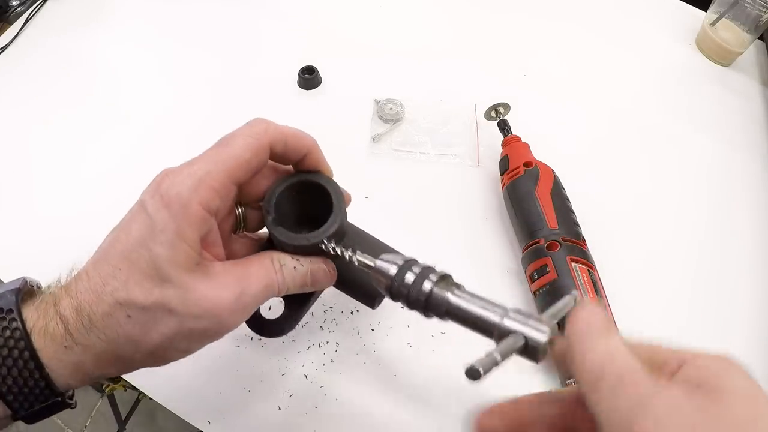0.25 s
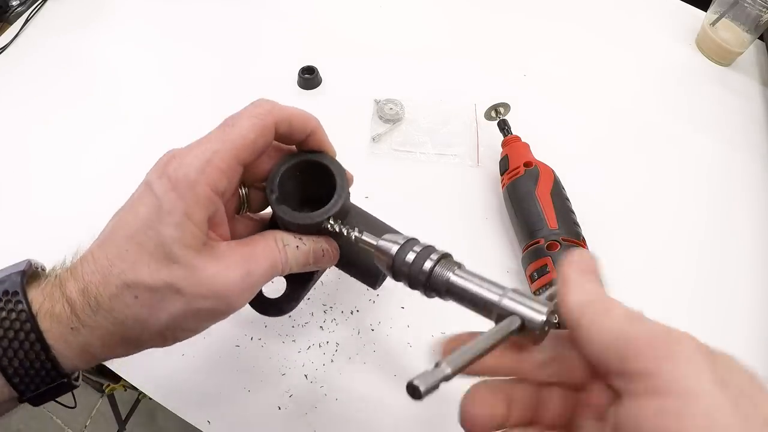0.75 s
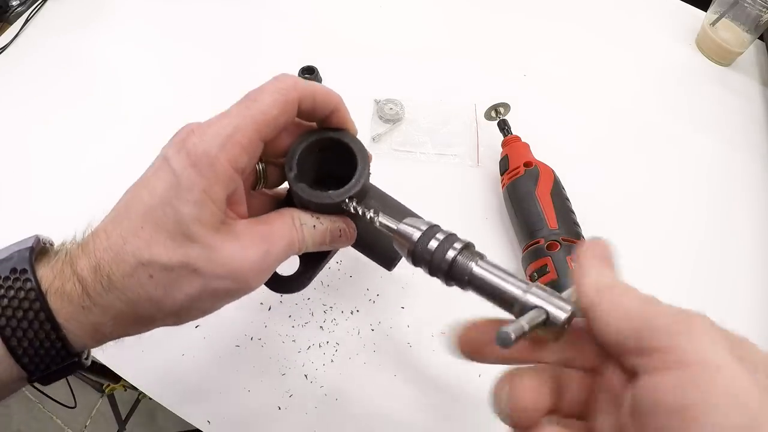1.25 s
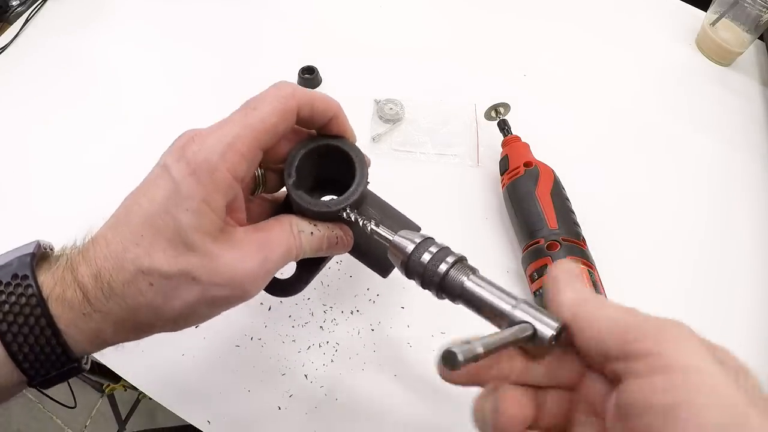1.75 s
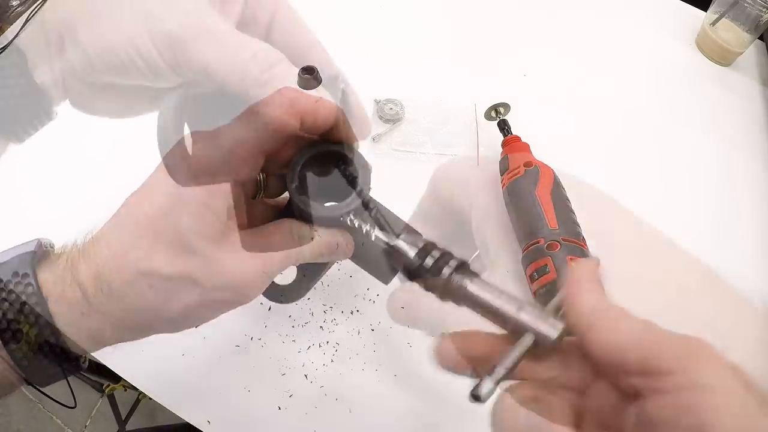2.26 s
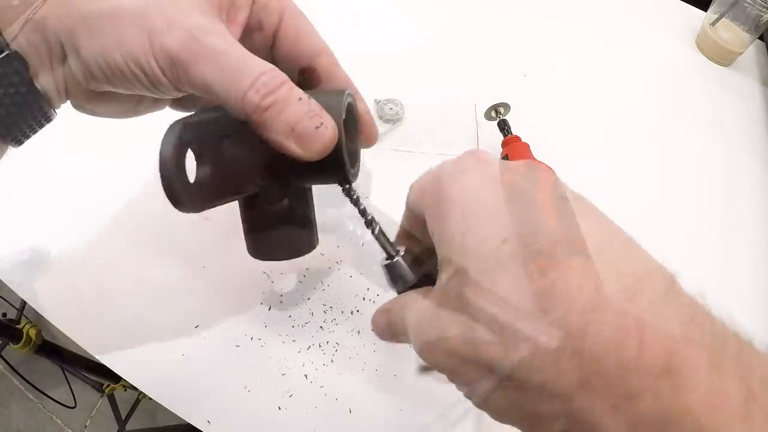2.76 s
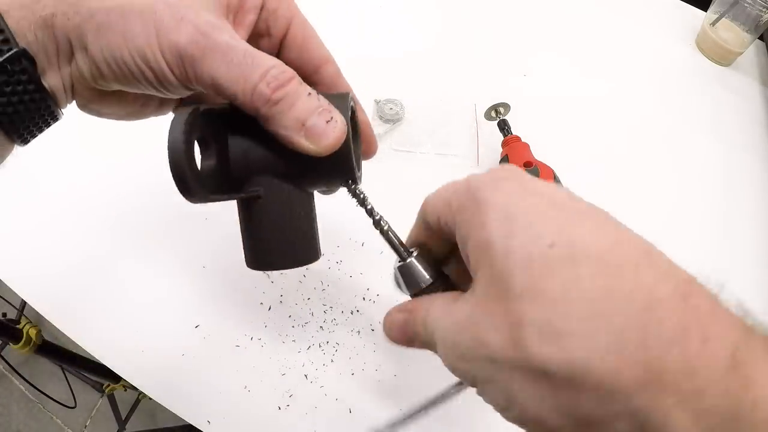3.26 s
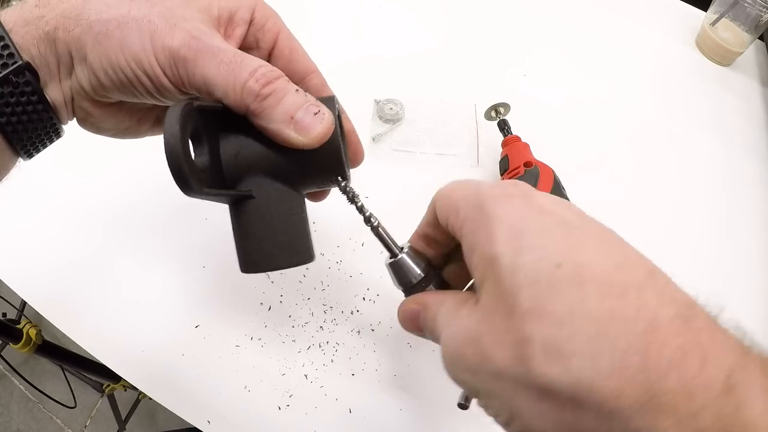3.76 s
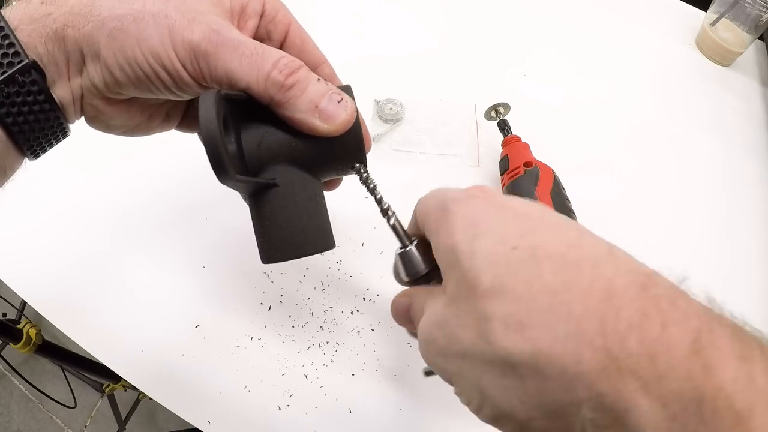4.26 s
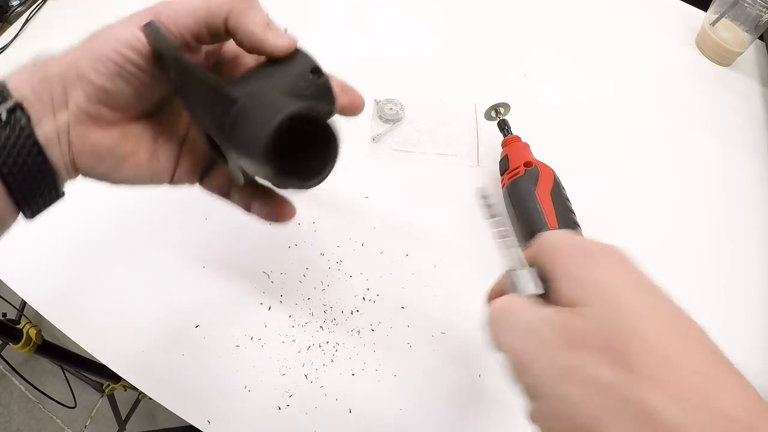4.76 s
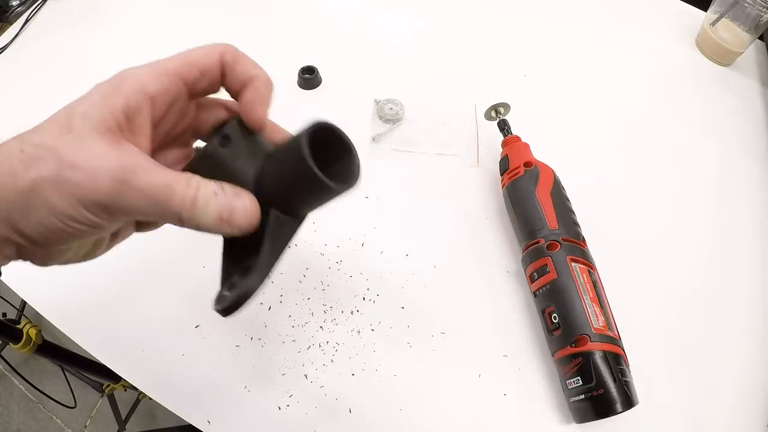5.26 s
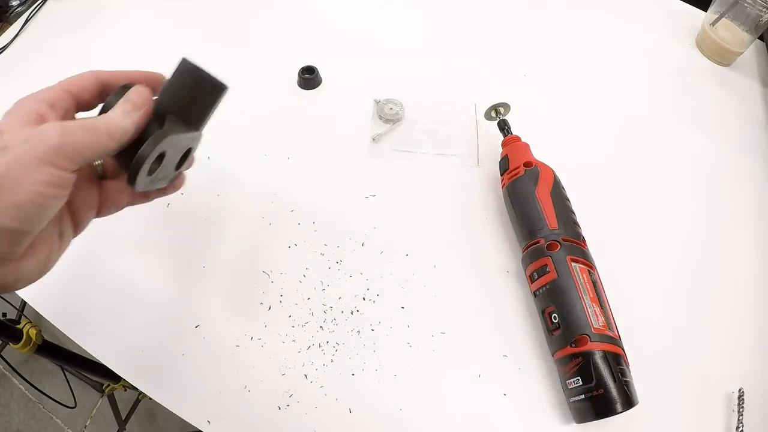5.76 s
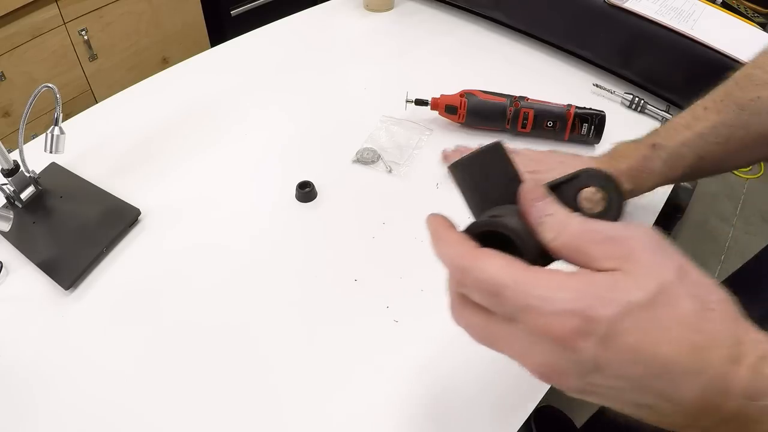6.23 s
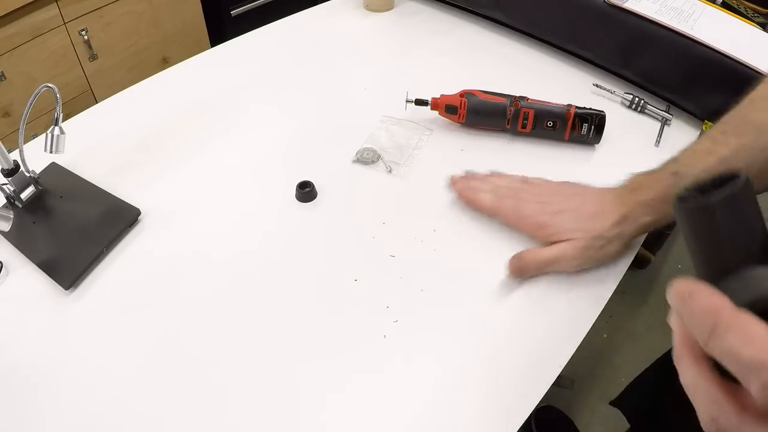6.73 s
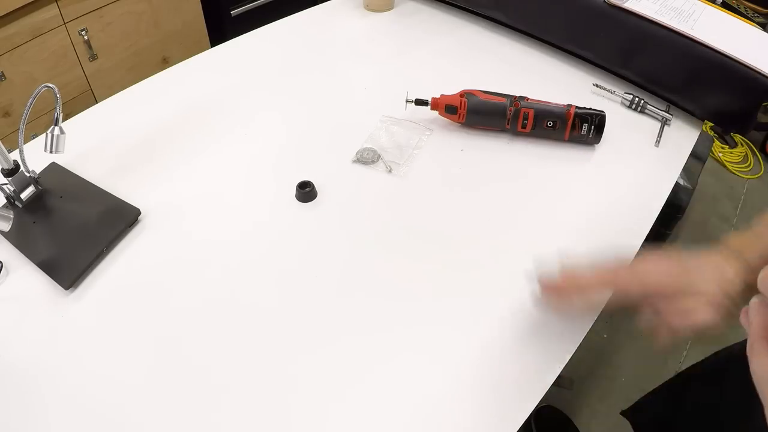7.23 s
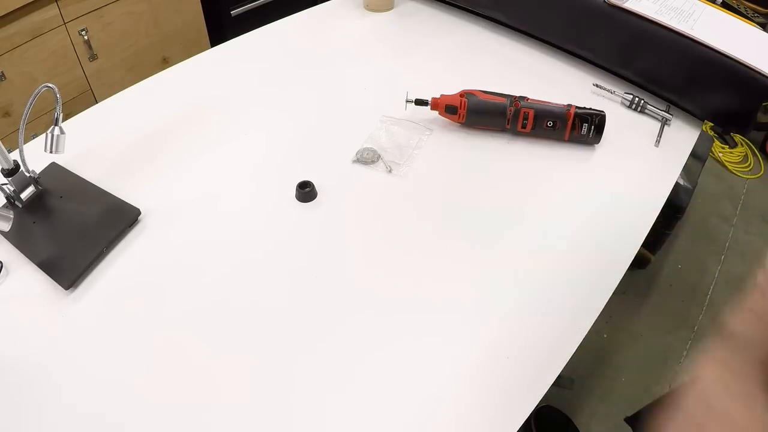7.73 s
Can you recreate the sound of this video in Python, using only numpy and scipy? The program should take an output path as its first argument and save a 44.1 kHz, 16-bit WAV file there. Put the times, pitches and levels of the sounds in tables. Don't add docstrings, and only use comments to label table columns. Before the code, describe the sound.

Metallic clanks, small hollow ticks and faint skin hiss, then a heavy metal-on-table crash, followed by brushing palm strokes in a quiet humming workshop.

```python
import sys
import numpy as np
from scipy import signal
from scipy.fft import rfft, irfft, next_fast_len
from scipy.io import wavfile
from scipy.ndimage import uniform_filter1d, map_coordinates

SR = 44100
rng = np.random.default_rng(int(sys.argv[2]) if len(sys.argv) > 2 else 0)


def volts(x):
    e = np.asarray(x, float) / 20
    return 10 ** e


def transcribe(u):
    v = np.clip(np.atleast_2d(u).T, -1, 1)
    q = np.round(v * 32767).astype(np.int16)
    wavfile.write(sys.argv[1], SR, q)


N = 352337


def unit(x):
    return x / np.sqrt(np.mean(x ** 2) + 1e-20)


def along(points, hz):
    f, v = np.transpose(points)
    return np.interp(np.log(hz + 1), np.log(f + 1), v)


def wobble(rate_hz):
    knots = rng.standard_normal(int(N * rate_hz / SR) + 4)
    return map_coordinates(knots, [np.arange(N) * rate_hz / SR])


def filtered(x, response):
    m = next_fast_len(len(x) + 8192)
    return irfft(rfft(x, m) * response(np.fft.rfftfreq(m, 1 / SR)), m)[:len(x)]


def peak(f, hz, width_hz):
    return 1j * f * width_hz / (hz * hz - f * f + 1j * f * width_hz + 1e-9)


def body(modes):
    return lambda f: sum((-1) ** k * volts(db) * peak(f, hz, w) for k, (hz, w, db) in enumerate(modes))


def coloured(x, spectrum):
    return unit(filtered(x, lambda f: volts(along(spectrum, f))))


def grit(spread_db):
    slip = np.minimum(rng.exponential(size=N // 40 + 1), 4).repeat(40)[:N]
    return rng.standard_normal(N) * volts(spread_db * slip)


def patchy(x, depth_db):
    z = signal.stft(x, nperseg=256)[2]
    field = uniform_filter1d(rng.standard_normal(z.shape), size=5, axis=0)
    field = uniform_filter1d(field, size=12, axis=1)
    return unit(signal.istft(z * volts(depth_db * unit(field)), nperseg=256)[1][:N])


def ring(modes, t, scatter_db):
    return sum(volts(db + rng.normal(0, scatter_db) - 60 * t / t60_s) * np.sin(2 * np.pi * hz * t)
               for hz, db, t60_s in modes)


def build_up(t, seconds=0.00038):
    return 1 - np.exp(-t / seconds)


def snap(t, hz, share, t60_s):
    burst = (3.6 + rng.standard_normal(len(t))) * volts(-60 * t / t60_s)
    crack = filtered(burst, lambda f: peak(f, hz, share * hz) * peak(f, hz, (share + .6) * hz))
    return crack / np.abs(crack).max()


def swells(starts_s, holds_s, rise_db_s, fall_db_s):
    late_s = np.arange(0, N, 32) / SR - np.array(starts_s)[:, None]
    rise_db = rise_db_s * late_s
    fall_db = fall_db_s * (np.array(holds_s)[:, None] - late_s)
    return volts(np.minimum(0, np.minimum(rise_db, fall_db)))


def total(levels_db, shapes):
    return np.sqrt(volts(2 * np.array(levels_db)) @ shapes ** 2).repeat(32)[:N]


def add(track, s, sound):
    start = round(s * SR)
    track[start:start + len(sound)] += sound[:len(track) - start]


def clanks():
    # start_s, peak_db, low_modes_db, rattle_db, free_ring_db
    clank_rows = [
        (.467, -26, -0.5, -13, -24),
        (1.513, -19, -7, -17, -22),
        (2.025, -22, -5, -12, -22),
        (2.509, -24.5, -3, -16, -33),
        (3.998, -38, -1.5, -9, -24),
        (4.351, -47, -13, -12, -12),
        (5.7654, -21, -23, -12, 4),
    ]
    # first_hz, second_hz, second_db, sheen_db
    shank_rows = [(9570, 12200, 5, -3), (12100, 15100, -11, -10.5), (12500, 10900, 2, -6),
                  (13300, 10000, 1, -8), (12200, 9000, 0, -7), (12300, 8000, -6, -8), (12000, 8200, 0, -6)]
    # hz, width_hz, level_db
    steel_modes = [(1700, 110, 7), (2180, 140, 5), (2600, 500, -8), (3590, 120, 4), (4700, 900, -14),
                   (5820, 500, -2), (9300, 630, -30)]
    # hz, width_hz, level_db
    bar_rough = [(12170, 280, 0), (6510, 300, -20), (13250, 300, -18)]
    # hz, level_db, t60_s
    bar_clear = [(11990, -3, .06), (12155, 8, .04), (12305, 0, .045), (6610, -34, .2)]
    # delay_s, level_db
    wall_rows = [(.0075, -10), (.017, -19), (.026, -21)]
    seat_s, wall_low_db = 0.001, -5
    out, t = np.zeros(N), np.arange(SR // 3) / SR
    push = 5 * volts(-60 * t / .0004)
    for clank, shank in zip(clank_rows, shank_rows):
        s, db, low_db, rattle_db, free_db = clank
        first_hz, second_hz, second_db, sheen_db = shank
        force = t / seat_s * np.exp(1 - t / seat_s) + volts(rattle_db - 60 * t / .06)
        hit = rng.standard_normal(len(t)) * force
        high = filtered(hit, lambda f: peak(f, first_hz, 1260) ** 2
                        - volts(second_db) * peak(f, second_hz, 1200) ** 2
                        + volts(sheen_db) * peak(f, 11400, 9700))
        low = filtered(hit + push, lambda f: body(steel_modes)(f) + 0.28 * peak(f, 2600, 7000))
        linger = unit(filtered(rng.standard_normal(len(t)), body(bar_rough))) * volts(-16 - 60 * t / 0.16)
        free = (ring(bar_clear, t, 1) + linger) * build_up(t)
        bright = high / np.abs(high).max() + volts(free_db) * free
        dark = volts(low_db) * low / np.abs(low).max()
        add(out, s, volts(db) * (bright + dark))
        for delay_s, wall_db in wall_rows:
            add(out, s + delay_s, volts(db + wall_db) * (bright + volts(wall_low_db) * dark))
    return out


def ticks():
    # start_s, ring_peak_db, crack_db, crack_hz
    bore_rows = [(.761, -48, -58, 5700), (.9856, -34, -46, 5180), (1.251, -51, -43, 4500),
                 (1.771, -43.5, -37.5, 8700), (2.0084, -32.5, -47, 6800), (2.282, -45, -42, 9100),
                 (2.883, -41.5, -49, 3730), (3.637, -50.5, -58, 9950), (3.871, -53, -44.5, 3700),
                 (4.001, -50, -41.5, 4500), (5.143, -49, -44, 6410)]
    # start_s, ring_peak_db, crack_db, crack_hz
    sleeve_rows = [(1.02, -25.5, -36.5, 4700), (2.449, -44, -49.5, 2900), (3.944, -64, -46.5, 4740),
                   (4.14, -52, -48, 4720), (5.063, -31, -42, 3830)]
    # start_s, ring_peak_db, ring_hz,
    # crack_db, crack_hz
    flange_rows = [(0.276, -39.5, 1920, -39.5, 3580), (.295, -39, 1540, -37.5, 2880),
                   (.532, -45, 870, -57, 11900), (.997, -35, 2060, -36, 6400),
                   (1.0594, -24.5, 1326, -29, 3120), (2.0225, -37, 1650, -45, 4600),
                   (5.7583, -17, 1900, -26, 4000), (5.7605, -21, 1980, -24, 3900),
                   (2.838, -46, 1450, -52, 7660), (5.237, -30.5, 1250, -36, 3020),
                   (5.588, -29, 1360, -38, 2100), (5.7045, -21, 640, -36, 1600),
                   (6.295, -36, 1140, -38, 1800), (7.899, -36, 710, -43.5, 7200),
                   (7.928, -40, 1210, -38, 2200)]
    bore_hz, bore_t60_s = 1745, 0.023
    sleeve_hz, sleeve_t60_s = 790, 0.024
    flange_t60_s = 0.014
    contacts = [(s, db, bore_hz, bore_t60_s, *crack) for s, db, *crack in bore_rows]
    contacts += [(s, db, sleeve_hz, sleeve_t60_s, *crack) for s, db, *crack in sleeve_rows]
    contacts += [(s, db, hz, flange_t60_s, *crack) for s, db, hz, *crack in flange_rows]
    out, t = np.zeros(N), np.arange(2048) / SR
    for s, db, hz, t60_s, crack_db, crack_hz in contacts:
        crack = snap(t, crack_hz, 0.12, 0.0077) + .75 * snap(t, crack_hz, 1.8, 0.0046)
        hollow_ring = ring([(hz, db + 1.5, t60_s)], t, 0) * build_up(t)
        add(out, s, volts(crack_db) * crack - hollow_ring)
    return out


def thuds():
    # start_s, peak_db, pitch_hz
    thud_rows = [
        (0.4676, -43.5, 420),
        (1.0587, -22, 1200),
        (1.514, -40, 420),
        (2.51, -43, 560),
        (5.2369, -31, 990),
        (6.295, -42, 900),
    ]
    out, t = np.zeros(N), np.arange(2048) / SR
    for s, db, hz in thud_rows:
        u = 2 * np.pi * hz * t
        add(out, s, -volts(db + 18.5) * u * u * (1 - u / 3) * np.exp(-u))
    return out


def snaps():
    # start_s, peak_db, centre_hz, width_share
    snap_rows = [(.26, -36, 13500, 0.32), (.275, -32, 12900, .5), (.2987, -27.5, 9700, 0.8),
                 (.193, -49, 2000, .6), (.7295, -46, 14200, .3), (.98, -43, 9000, .6),
                 (.997, -38, 6700, .15), (.816, -29, 13900, 0.12), (.971, -44, 9000, 0.58),
                 (.987, -36, 15000, .2), (1.007, -42, 8330, .3), (1.0404, -27.5, 7800, 0.09),
                 (1.0403, -29, 8500, 1.2), (1.0405, -41, 3200, .15), (1.195, -48, 9500, .5),
                 (1.252, -37.5, 8950, 0.11), (1.393, -43.5, 3900, 1), (2.646, -47, 12500, .4),
                 (2.75, -48, 5500, .8), (2.776, -50, 6000, 1.2), (2.282, -45, 4000, 1.3),
                 (2.5105, -35, 1700, .05), (5.589, -40, 3900, .4), (7.9285, -43, 3500, .5),
                 (2.928, -42, 3800, .7), (2.919, -41, 6000, .9), (3.87, -43, 8400, .2),
                 (3.871, -45, 3500, 1), (4.132, -30.5, 7800, 0.17), (4.352, -42.5, 4400, 0.22),
                 (4.359, -47, 2700, .3), (4.985, -44, 5000, 1), (5.37, -52, 3200, .6),
                 (5.403, -50, 5000, 1), (5.449, -49, 5000, 1.2), (5.063, -36, 7950, 0.33),
                 (5.2115, -29.5, 8800, 0.33), (5.785, -30, 7000, 1), (5.8165, -33, 8800, .2),
                 (5.293, -45, 9500, .4), (5.704, -44, 4500, 1.2), (5.777, -20, 9300, .27),
                 (7.928, -35, 8950, 0.99)]
    # start_s, peak_db, centre_hz, width_share (of centre)
    jaw_rows = [(.9945, -35, 11000, 1.8), (2.009, -39, 5500, 0.53), (5.779, -30, 9000, 1.1)]
    snap_t60_s, jaw_t60_s = 0.0056, 0.055
    out, t = np.zeros(N), np.arange(2048) / SR
    for rows, t60_s in (snap_rows, snap_t60_s), (jaw_rows, jaw_t60_s):
        for s, db, hz, share in rows:
            add(out, s, volts(db) * snap(t, hz, share, t60_s))
    return out


def rubbing():
    # start_s, hold_s, skin_db, bite_db (edge over skin)
    slide_rows = [(0.027, 0.068, -51, -8.5), (0.153, 0.041, -61, -12), (0.29, 0.093, -57.5, -22),
                  (0.487, 0.018, -60, -7), (0.622, 0.022, -52.5, -4), (0.817, 0.035, -66.5, -5),
                  (1.127, 0.015, -50, -5), (1.27, 0.08, -69, -7), (1.63, 0.039, -55.5, -5),
                  (1.846, .015, -67, -11), (1.907, 0.013, -67.5, -4.5), (2.12, 0.033, -56, -4),
                  (2.413, 0.024, -55.5, -10.5), (2.536, 0.044, -67, -7), (2.633, 0.021, -59.5, -4),
                  (2.74, 0.045, -66.5, -5), (2.85, 0.03, -62, -7), (2.93, 0.13, -76, 1),
                  (3.298, 0.09, -60.5, -6.5), (3.458, 0.57, -61.5, -9.5), (4.022, 0.12, -68, -4),
                  (4.347, 0.014, -68.5, -7), (4.924, 0.013, -53.5, -1), (4.975, 0.05, -65, 5),
                  (5.102, .02, -61.5, -3), (5.148, 0.015, -57.5, -4.5), (5.19, .01, -64, -2),
                  (5.363, 0.096, -74.5, -1)]
    # start_s, level_db
    catch_rows = [(.12, -79), (1.253, -59), (1.768, -59), (2.28, -59), (3.872, -67), (4.358, -62),
                  (5.094, -61)]
    # start_s, hold_s, level_db
    fumble_rows = [(4.72, 0.018, -65.5), (4.755, .012, -62), (4.782, 0.014, -59.5), (4.842, 0.018, -63),
                   (5.224, .004, -63), (5.262, 0.018, -63), (5.308, 0.016, -64), (5.478, 0.037, -62),
                   (5.542, 0.031, -63)]
    # start_s, hold_s, level_db
    bear_rows = [(0, 0.1, -64), (.49, .015, -66), (0.603, 0.028, -58.5), (0.743, 0.14, -75),
                 (1.06, 0.19, -63.5), (1.256, .012, -55), (1.3, 0.19, -67), (1.528, 0.28, -63),
                 (2.05, 0.13, -67), (2.275, .003, -65), (2.425, .03, -68), (2.53, 0.14, -70),
                 (2.648, .015, -67), (2.876, .003, -70), (3.64, .003, -73), (3.972, 0.034, -68),
                 (4.79, .01, -66), (4.9, .04, -64), (4.995, 0.045, -62), (5.14, 0.019, -62),
                 (5.25, 0.42, -64)]
    # hz, level_db (per Hz)
    skin_colour = [(2350, -31), (4000, -20), (4690, -20), (5930, -4.5), (6790, -7), (7660, -3.5),
                   (13300, -7), (15600, -5.5)]
    # hz, level_db (per Hz)
    tip_colour = [(2000, -30), (3000, -12), (4200, -3), (5200, -5), (6600, -3.5), (8500, -5), (12000, -9.5),
                  (15600, -10)]
    # hz, width_hz, level_db
    rasp_modes = [(2650, 450, 3.5), (3610, 460, 6), (4500, 320, 5.5), (4940, 580, 3.5), (6400, 810, 1),
                  (7400, 400, -12)]
    # hz, width_hz, level_db
    hollow_modes = [(1277, 350, -3), (1703, 99, 5), (2126, 350, -8)]
    handled_s, laid_down_s = 4.6, 5.705
    rest_db, tip_bite_db = -81, 2.5

    s, hold_s, skin_db, bite_db = np.transpose(slide_rows)
    slides = swells(s, hold_s, 207, 260)
    skin = total(skin_db, slides)
    catch_s, catch_db = np.transpose(catch_rows)
    catches = total(catch_db, swells(catch_s, 0 * catch_s, 1800, 830))
    edge = total(skin_db + bite_db, slides) + catches
    tip_s, tip_hold_s, tip_db = np.transpose(fumble_rows)
    tips = total(tip_db, swells(tip_s, tip_hold_s, 1700, 1100))
    bear_s, bear_hold_s, bear_db = np.transpose(bear_rows)
    wall = total(bear_db, swells(bear_s, bear_hold_s, 470, 270))
    rest = volts(rest_db) * (np.arange(N) < laid_down_s * SR)

    grip = patchy(coloured(grit(spread_db=1.5), skin_colour), depth_db=2)
    pads = patchy(coloured(grit(spread_db=1.8), tip_colour), depth_db=2.5)
    hiss = np.where(np.arange(N) < handled_s * SR, grip, pads)
    rasp = patchy(filtered(grit(spread_db=1.3), body(rasp_modes)), depth_db=2)
    hollow = patchy(filtered(grit(spread_db=1.5), body(hollow_modes)), depth_db=1.5)

    out = (skin + tips + rest) * hiss
    out += (edge + volts(tip_bite_db) * tips + rest / 2) * rasp
    out += (wall + rest) * hollow
    return volts(2.0 * wobble(35)) * out


def squeaks():
    # start_s, length_s, level_db, pitch_hz, width_hz
    squeak_rows = [(3.45, .45, -73, 4440, 300), (3.45, .45, -71, 9300, 350), (3.5, 0.36, -69, 13500, 1200),
                   (4.713, 0.041, -59, 2650, 250), (4.78, 0.025, -59, 6450, 500),
                   (4.895, 0.054, -54, 4050, 820), (4.845, 0.033, -61, 2620, 300),
                   (4.72, .025, -60, 4600, 700), (5.475, 0.037, -63, 5200, 900), (.3, 0.2, -68, 10000, 400),
                   (.8, .045, -63, 9300, 4000), (.6, 0.051, -61, 3450, 300), (2.41, .055, -61, 10200, 2500),
                   (2.84, 0.058, -63, 7300, 1500), (6.2, .06, -50, 1620, 250),
                   (6.12, 0.094, -52.5, 2560, 500), (7.825, 0.04, -52, 850, 800),
                   (6.33, 0.09, -44, 1850, 350), (6.4, .05, -46, 2500, 600), (6.29, .03, -51, 800, 900),
                   (6.537, 0.049, -42, 2900, 700), (6.78, 0.19, -48, 1620, 120), (6.96, .1, -52, 1550, 200),
                   (6.962, 0.1, -44, 2640, 780)]
    out = np.zeros(N)
    for s, length_s, db, hz, width_hz in squeak_rows:
        noise = unit(filtered(rng.standard_normal(SR // 2), lambda f: peak(f, hz, width_hz) ** 2))
        swell = np.sqrt(np.hanning(round(length_s * SR)))
        add(out, s, volts(db) * swell * noise[:len(swell)])
    return out


def squeals():
    # start_s, length_s, level_db, first_hz, last_hz
    squeal_rows = [
        (2.285, .1, -68, 11300, 13700),
        (5.295, .055, -69, 10300, 10000),
        (5.335, .04, -69, 9400, 8800),
        (5.43, .03, -70, 8500, 9300),
    ]
    out, waver = np.zeros(N), volts(.12 * wobble(40))
    for s, length_s, db, first_hz, last_hz in squeal_rows:
        swell = np.sqrt(np.hanning(round(length_s * SR)))
        hz = np.linspace(first_hz, last_hz, len(swell)) * waver[round(s * SR):][:len(swell)]
        add(out, s, volts(db) * swell * np.sin(2 * np.pi * np.cumsum(hz) / SR))
    return out


def dragging():
    # hz, width_hz, level_db
    drag_modes = [(1320, 170, 5.5), (1700, 180, 3), (2200, 340, -4.5), (2720, 100, -22), (3550, 260, -9)]
    start_s, hold_s, level_db, sag_db = 5.587, .119, -43.5, 8.5
    u = (np.arange(N) / SR - start_s) / hold_s
    chatter = unit(filtered(grit(spread_db=1.2) * volts(1.5 * wobble(90)), body(drag_modes)))
    return volts(level_db - sag_db * np.clip(u, 0, 1)) * (u > 0) * (u < 1) * chatter


def table():
    # start_s, crack_peak_db, hardness_hz, modes_db, boom_db
    blow_rows = [
        (5.704, -20, 1120, -37, -45),
        (5.758, -17.5, 2800, -25.5, -38),
        (5.7652, -10, 2040, -19.5, -33.5),
        (5.778, -17.5, 4500, -32, -39.5),
        (5.816, -28, 4000, -45, -46.5),
    ]
    # hz, level_db, t60_s
    top_modes = [(72, -11, 0.9), (142.3, -4, 0.5), (236, -16, 0.54), (324.4, -7, 0.33), (458, -5, 0.33),
                 (702, -19, 0.47), (910, -15, 0.39), (1081, -20, 0.47), (1231, -13, 0.27),
                 (1405, -10, 0.16), (1510, -8, .2), (1660, -17, .35), (1827, -15, .35), (2110, -22, .35)]
    # hz, level_db (per Hz)
    boom_colour = [(29, -40), (50, -23), (101, -14), (141, -5), (175, -8), (234, -11), (271, -10),
                   (520, -9), (1000, -16), (2300, -19.5), (3200, -28), (5400, -33.5), (12300, -34),
                   (16000, -63)]
    out, t = np.zeros(N), np.arange(SR // 2) / SR
    for s, db, hard_hz, modes_db, boom_db in blow_rows:
        burst = rng.standard_normal(len(t)) * volts(-60 * t / 0.027)
        crack = filtered(burst, lambda f: peak(f, hard_hz / 2, hard_hz) ** 2 / (1 + 1j * f / hard_hz))
        modes = ring(top_modes, t, 1) * build_up(t, 0.0043)
        soft = lambda f: 0.43 + 1 / (1 + (f / hard_hz) ** 4)
        boom = filtered(decaying(.5)[:len(t)], lambda f: volts(along(boom_colour, f)) * soft(f))
        boom = boom * build_up(t, 0.0011)
        add(out, s, volts(db) * crack / np.abs(crack).max() + volts(modes_db) * modes + volts(boom_db) * unit(boom))
    return out


def cupped_hand(pushes, push_hz):
    # hz, level_db (per Hz)
    cup_colour = [(700, -37), (1150, -7.5), (1500, -1.5), (2000, -3), (2800, -3), (3900, -2.5), (6000, -8),
                  (8000, -8.5), (13000, -75)]
    pocket_hz = [1500, 1900, 2400, 3000, 3800]
    cup_hz = push_hz[pushes.argmax(axis=0)].repeat(32)[:N]
    cup_hz = uniform_filter1d(cup_hz, size=2000) * volts(1.5 * wobble(8.8))
    air = coloured(grit(spread_db=1.0), cup_colour)
    pocket = np.zeros(N)
    for hz in pocket_hz:
        nearness = np.exp(-(np.log(cup_hz / hz) / 0.36) ** 2)
        pocket += nearness * filtered(air, lambda f: peak(f, hz, 0.8 * hz))
    return patchy(air + 0.5 * pocket, depth_db=2.0)


def sweeping():
    # start_s, hold_s, hiss_db, cup_db (over hiss), cup_hz
    sweep_rows = [(6.104, 0.13, -46, 0, 2430), (6.329, 0.085, -40, -1, 2120), (6.46, 0.091, -49, -16, 2820),
                  (6.55, 0.045, -51.5, 5.5, 2800), (6.735, .04, -49, -6, 1900),
                  (6.807, 0.12, -45.5, 4, 2200), (7.007, 0.049, -41, -4, 2610),
                  (7.1, 0.083, -50.5, -8, 2400), (7.24, 0.031, -62.5, -0.5, 2390),
                  (7.424, 0.061, -47.5, 0, 2460), (7.53, .03, -58.5, 4.5, 2000),
                  (7.651, 0.036, -40, 1, 2880), (7.726, 0.024, -45, -12, 2900),
                  (7.854, 0.33, -62.5, 3, 1880)]
    # hz, level_db (per Hz)
    palm_colour = [(2350, -27), (4000, -14), (5110, -3), (12500, -2.5), (13800, -3.5), (15600, -6)]
    contact_s = [6.722, 7.21, 7.383]
    s, hold_s, hiss_db, cup_db, push_hz = np.transpose(sweep_rows)
    pushes = swells(s, hold_s, 225, 142)
    same = np.searchsorted(contact_s, s)[:, None] == np.searchsorted(contact_s, np.arange(0, N, 32) / SR)
    pushes = pushes * uniform_filter1d(np.where(same, 1, volts(-15)), size=24, axis=1)
    low = unit(filtered(rng.standard_normal(N), lambda f: peak(f, 190, 700) ** 2))
    top = patchy(filtered(rng.standard_normal(N), lambda f: peak(f, 740, 1020) ** 2), depth_db=-4.5)
    hiss = patchy(coloured(grit(spread_db=0.5), palm_colour), depth_db=1.35)
    hiss_gain = total(hiss_db, pushes)
    out = hiss_gain * (hiss + volts(-17) * top)
    out += total(hiss_db + cup_db, pushes) * cupped_hand(pushes, push_hz)
    return out + volts(-33) * np.sqrt(hiss_gain) * low


def bumps():
    # start_s, length_s, level_db
    bump_rows = [(6.439, 0.082, -46.5), (6.72, 0.06, -44), (7.086, 0.09, -44.5), (7.18, .04, -44.5),
                 (7.375, 0.05, -53), (7.743, 0.045, -43)]
    out = np.zeros(N)
    rumble = unit(filtered(rng.standard_normal(N), lambda f: peak(f, 117, 215) ** 2))
    for s, length_s, db in bump_rows:
        swell = np.hanning(round(length_s * SR))
        add(out, s, volts(db) * swell * unit(rumble[round(s * SR):][:len(swell)]))
    return out


def decaying(seconds):
    # hz, t60_s
    room_decay = [(100, 0.69), (500, 0.6), (2000, 0.55), (6000, 0.73), (14000, 0.28)]
    hz, t, z = signal.stft(rng.standard_normal(int(seconds * SR)), SR, nperseg=256)
    fade = volts(-60 * t / along(room_decay, hz)[:, None])
    tail = signal.istft(z * fade, SR, nperseg=256)[1]
    return tail / np.linalg.norm(tail)


def echo(sound):
    return volts(-14.0) * signal.fftconvolve(np.pad(sound, (200, 0)), decaying(0.54))[:N]


def workshop():
    # hz, level_db (per Hz)
    air_colour = [(18, -40), (33, -12), (52, -2), (90, -9), (127, -3.5), (164, -8), (243, -9.5), (263, -12),
                  (370, -13.5), (577, -18), (624, -18.5), (770, -20.5), (924, -25.5), (1690, -32.5),
                  (2770, -38), (15600, -44.5)]
    # hz, width_hz, level_db
    hum_lines = [(117.8, 8.2, -63), (133.4, 12.3, -56.5), (239.3, 8, -65), (478, 9.4, -70.5)]
    air_db = -51
    hum = sum(volts(db) * unit(filtered(rng.standard_normal(N), lambda f: peak(f, hz, w)))
              for hz, w, db in hum_lines)
    drift = volts(.7 * wobble(4))
    return volts(air_db) * drift * coloured(rng.standard_normal(N), air_colour) + hum


def scene():
    hits = clanks() + ticks() + thuds()
    palm = sweeping() + bumps()
    mono = hits + snaps() + rubbing() + squeaks() + squeals() + dragging() + table() + palm
    mono = mono + echo(hits + volts(-3.5) * palm) + workshop()
    return np.array([mono, mono])


def band_limit(x):
    return signal.sosfilt(signal.butter(12, 16970, fs=SR, output="sos"), x)


def record(dry):
    steady_hz, top_hz = 15800, 16950
    under = lambda f, edge_hz: .5 - .5 * np.tanh((f - edge_hz) / 40)
    bass_cut = lambda f: (1j * f / (45 + 1j * f)) ** 5
    response = lambda f: bass_cut(f) * (under(f, steady_hz) + volts(-38.5) * under(f, top_hz))
    squeezed = dry[0] / (1 + np.abs(dry[0] / .47) ** 4) ** .25
    mono = filtered(squeezed, response) - .0006
    return band_limit(np.array([mono, mono]))


dry = scene()
out = record(dry)
transcribe(out)
```